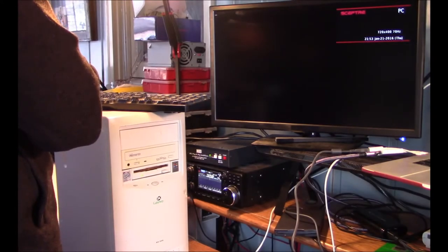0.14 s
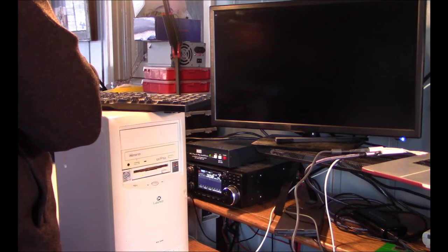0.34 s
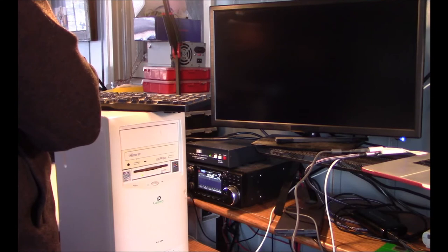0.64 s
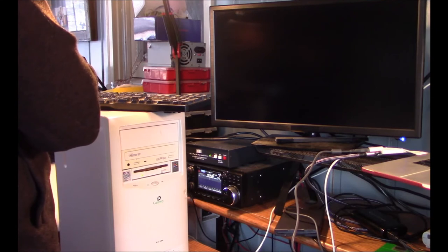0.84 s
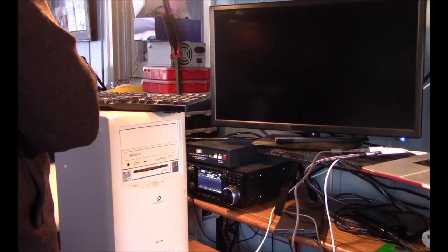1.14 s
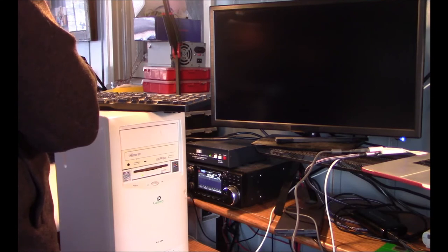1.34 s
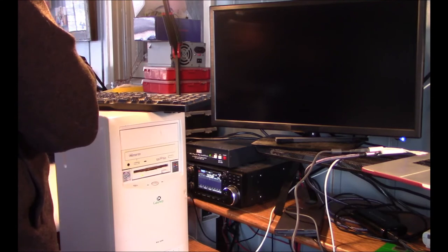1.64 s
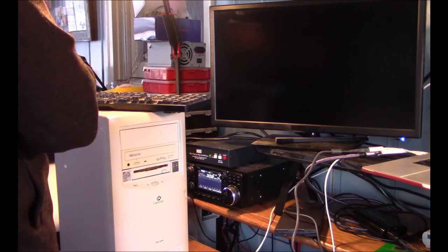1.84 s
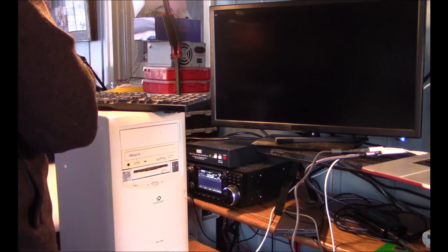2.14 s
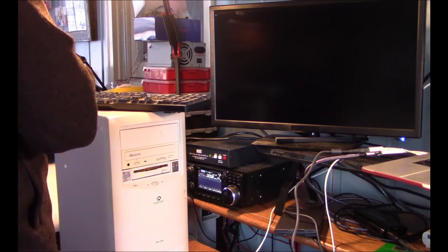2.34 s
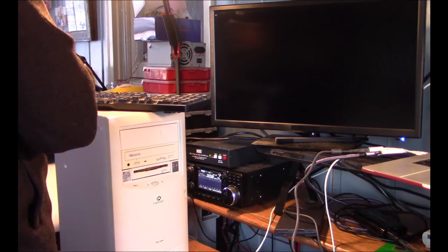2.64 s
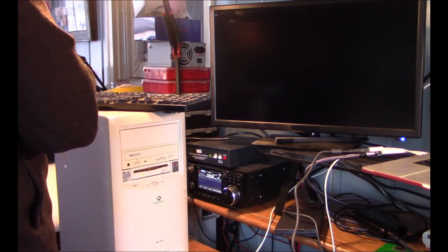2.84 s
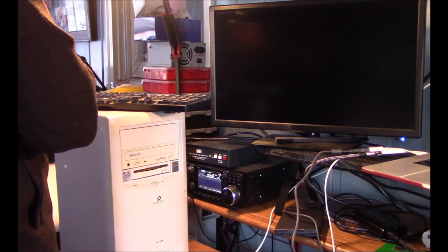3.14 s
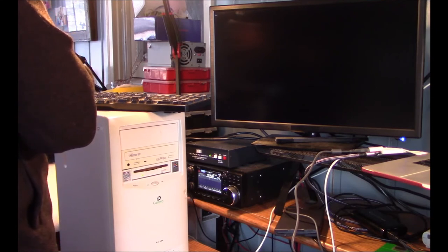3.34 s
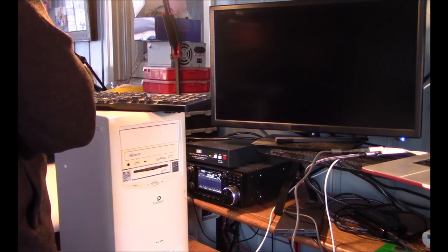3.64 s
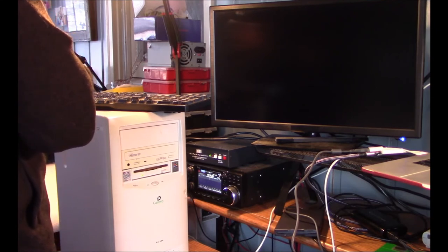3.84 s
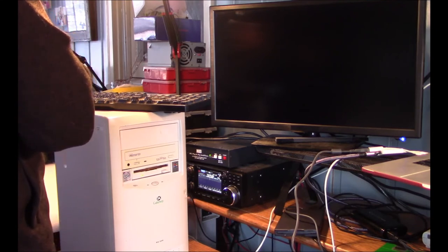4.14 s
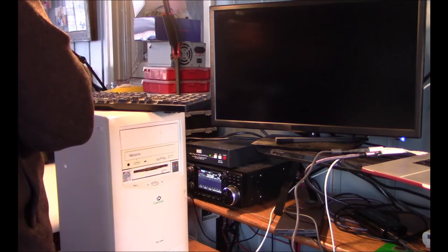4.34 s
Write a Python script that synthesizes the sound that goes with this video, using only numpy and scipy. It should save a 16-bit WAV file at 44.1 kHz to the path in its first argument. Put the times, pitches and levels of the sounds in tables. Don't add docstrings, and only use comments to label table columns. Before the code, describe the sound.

Rapid, even scratchy swishes from a disk rubbing inside its plastic shell, nearly identical each turn, with soft fan air and mains hum behind.

```python
import sys
import numpy as np
from scipy import signal
from scipy.fft import rfft, irfft, next_fast_len
from scipy.io import wavfile
from scipy.ndimage import uniform_filter1d, map_coordinates

SR = 44100
rng = np.random.default_rng(int(sys.argv[2]) if len(sys.argv) > 2 else 0)


def unload_audio(sound):
    columns = np.transpose(np.atleast_2d(sound))
    steps = np.round(np.clip(columns, -1, 1) * 32767)
    wavfile.write(sys.argv[1], SR, steps.astype(np.int16))


def nominal_scale(level):
    x = np.asarray(level, float) / 20
    return 10 ** x


N = 198109
TURN = 8816
TURNS = N // TURN + 2
LEAD_IN = TURN // 20
HZ = np.fft.rfftfreq(TURN, 1 / SR)


def unit(x):
    return x / np.sqrt(np.mean(x ** 2) + 1e-20)


def along(points, hz):
    f, v = np.transpose(points)
    return np.interp(np.log(hz + 1), np.log(f + 1), v)


def unrolled(turns):
    return turns.reshape(-1)[LEAD_IN:][:N]


def turn_time():
    return (np.arange(TURN) - LEAD_IN) / SR


# (frequency [Hz], likeness [0-1])
SURFACE_MEMORY = [(1000, .997), (3000, .985), (6000, .968), (9000, .93), (14000, .9)]
# (frequency [Hz], level [dB])
FRESH_RUBBING = [(1000, -16), (3000, -18), (6000, -18), (9000, -15), (14000, -12)]


def surface():
    worn, loose = rfft(rng.standard_normal((2, TURNS, TURN)))
    keep = np.clip(along(SURFACE_MEMORY, HZ), 0, 1)
    renew = np.sqrt(1 - keep ** 2)
    for k in range(1, TURNS):
        worn[k] = keep * worn[k - 1] + renew * worn[k]
    return worn + nominal_scale(along(FRESH_RUBBING, HZ)) * loose


# (frequency [Hz], level [dB per Hz])
SCRAPE_COLOUR = [(350, -66), (600, -17.5), (1150, -19), (1860, -8), (2340, -11.5), (2910, 3.5),
                 (3420, -5.5), (6950, -8.5), (7400, -13.5), (10200, -16.5), (11900, -14.5), (12200, -20.5),
                 (14000, -16), (15100, -22.5)]
# (frequency [Hz], width [Hz], level [dB])
SHELL_RINGS = [(1004, 25.3, -7.5), (1530, 56, -10), (1810, 20, -13), (2050, 61, -9), (2680, 90, -13),
               (2880, 100, -24), (2970, 60, -1), (3660, 15, -6.5), (3970, 17, -7.5), (4220, 18.4, 1),
               (4870, 8.3, 4), (5080, 39, 0), (5340, 65, -4.5), (6058, 64, -4.5), (6380, 26, -4),
               (6750, 67, -10), (6680, 46, -11.5), (7310, 28, -12), (7840, 32, -13.5), (8240, 26, -12),
               (8930, 32, -13), (8860, 54, -14)]
# (frequency [Hz], width [Hz], level above the scrape before a common boost [dB])
SHUTTER_RINGS = [(9750, 59, 0.5), (10800, 39, -10), (10350, 72, -7), (11170, 52, 0.5), (12010, 50, 3.5),
                 (12700, 39, -14), (12800, 58, -18), (13750, 150, -8)]


def resonance(centre_hz, width_hz):
    return 1 / (1 + (2 * (HZ - centre_hz) / width_hz) ** 2)


def body_colour(peaks_db, shutter_db):
    power = np.ones(len(HZ))
    for hz, width, db in SHELL_RINGS:
        above_scrape = nominal_scale(db + peaks_db - along(SCRAPE_COLOUR, hz))
        power += above_scrape ** 2 * resonance(hz, width)
    for hz, width, db in SHUTTER_RINGS:
        power += nominal_scale(db + shutter_db) ** 2 * resonance(hz, width)
    return nominal_scale(along(SCRAPE_COLOUR, HZ)) * np.sqrt(power)


# (time [s], pressure [dB], brightness [dB])
CONTACT_SWELL = [
    (-0.004, -22, -0.5),
    (0.001, -4, -0.5),
    (0.02, -2, 1),
    (0.059, -1.5, 1.5),
    (0.087, 2, 0),
    (0.107, -1, -2.5),
    (0.127, -5.5, -5),
    (0.157, -13.5, -5.5),
    (0.19, -24.5, -3),
]
PART_EDGES = [600, 2300, 4500, 7500, 15200]
# (level at full pressure [dB], gain per dB of brightness [dB])
RUBBING_PARTS = [(-47.5, 0.3), (-47, -1.54), (-43, 1.17), (-47, 1.34)]


def rubbing(colour, level_db, blur_s):
    rough = surface() * colour
    s, pressure_db, bright_db = np.transpose(CONTACT_SWELL)
    out = 0
    for low, high, (db, gain) in zip(PART_EDGES, PART_EDGES[1:], RUBBING_PARTS):
        slopes = (1 + (low / (HZ + 1)) ** 12) * (1 + (HZ / high) ** 12)
        band = (HZ < 15100) / np.sqrt(slopes)
        press_db = np.interp(turn_time(), s, pressure_db + gain * bright_db, period=TURN / SR)
        press = nominal_scale(press_db + db + level_db)
        press = uniform_filter1d(press, 1 + int(blur_s * SR), mode="wrap")
        out = out + press * unit(irfft(rough * band, TURN))
    return unrolled(out)


def settling(extra_db, lasts_s, turns):
    edge = np.exp(-((turn_time() - lasts_s) / lasts_s) ** 2)
    unsettled = np.exp(-np.arange(TURNS)[:, None] / turns)
    return unrolled(nominal_scale(extra_db * edge * unsettled))


# (time in turn [s], pitch [Hz], peak level [dB], half length [ms])
SQUEALS = [(0.011, 5920, -43, 2.3), (0.014, 4830, -45.5, 5), (0.017, 5170, -48, 2.5),
           (0.019, 4190, -43, 4.3), (0.0183, 6630, -46, 2.3), (0.022, 5900, -40, 4.5),
           (0.043, 4870, -45, 4.6), (0.036, 1840, -46.5, 8.6), (0.023, 1830, -50, 6),
           (0.0316, 7070, -43.5, 4.8), (0.0353, 5290, -42, 2.5), (0.0382, 6770, -38, 3.3),
           (0.0415, 5420, -36.5, 2.4), (0.05, 7090, -42, 9.1), (0.053, 6730, -39, 4.6),
           (0.0517, 6380, -43, 4), (0.052, 5820, -47, 2.5), (0.054, 6060, -40.5, 3.2),
           (0.0726, 6770, -38, 2.5), (0.075, 5300, -36.5, 3), (0.0752, 7116, -37, 4.6),
           (0.0704, 7500, -44, 3), (0.0778, 6000, -36.5, 3.1), (0.082, 5110, -38.5, 1.3),
           (0.0897, 6050, -41.5, 6), (0.0935, 5200, -41.5, 3.3), (0.097, 4870, -38, 4.3),
           (0.0978, 4170, -42.5, 11.5), (0.1118, 3970, -42, 3.6), (0.12, 5080, -45.5, 2.1)]
# (time in turn [s], pitch [Hz], peak level [dB])
EDGE_KNOCKS = [(0.004, 2855, -32), (0.011, 2844, -45.5), (0.007, 3660, -44.5), (0.021, 2920, -40),
               (0.0287, 2865, -34.5), (0.0479, 2908, -36), (0.064, 2680, -35.5), (0.061, 2970, -41),
               (0.067, 3130, -38), (0.078, 2640, -35.5), (0.076, 3080, -40), (0.09, 2767, -38),
               (0.097, 2987, -38), (0.105, 2830, -40), (0.115, 2980, -35), (0.094, 1568, -44.5),
               (0.03, 1545, -49.5), (0.059, 2106, -45), (0.099, 3670, -44), (0.122, 2820, -40),
               (0.142, 2770, -44), (0.168, 2880, -47)]
# (time in turn [s], peak level [dB])
PANEL_SHOVES = [
    (0.027, -53.5),
    (0.045, -49.5),
    (0.058, -44.5),
    (0.08, -45.5),
    (0.098, -47.5),
    (0.114, -48),
    (0.128, -47.5),
    (0.168, -54),
]


def catches():
    spots = list(SQUEALS)
    for s, hz, db in EDGE_KNOCKS:
        ring_ms = 2.68 * nominal_scale(0.24 * (db + 39))
        spots.append((s, hz, db, ring_ms))
    for s, db in PANEL_SHOVES:
        spots.append((s, 1011, db, 3.98))
    luck = rng.standard_normal((len(spots), 2, TURNS))
    out = np.zeros((TURNS, TURN))
    for (s, hz, db, ms), (size, creep) in zip(spots, luck):
        t = turn_time() - s + 7e-6 * np.cumsum(creep)[:, None]
        swell = nominal_scale(db + 0.5 * size[:, None]) * np.exp(-0.5 * (t / (ms / 1000)) ** 2)
        out += swell * np.sin(2 * np.pi * hz * (t + s))
    return unrolled(out)


# (frequency [Hz], level [dB])
WALL_COLOUR = [(600, -8), (1200, -55), (2500, -66), (3800, -26), (5000, -0.5), (6500, 4.5), (7500, -1),
               (10000, 8), (12000, 10), (13000, -4), (15000, -25)]


def wall_reflections(colour):
    smeared = rubbing(colour * nominal_scale(along(WALL_COLOUR, HZ)), level_db=-25.0, blur_s=0.025)
    return smeared * [[1], [-1]]


# (frequency [Hz], level [dB rms], drift [dB per s])
MAINS_HARMONICS = [(60, -86, 1.5), (120, -75, 0), (180, -75, 0), (240, -69.5, -.7), (300, -73, 0),
                   (360, -74, .4), (480, -79, 0)]


def hum():
    t = np.arange(N) / SR
    out = np.zeros((2, N))
    for hz, db, drift in MAINS_HARMONICS:
        knots = rng.standard_normal(int(N * 3 / SR) + 4)
        sway = map_coordinates(knots, [t * 3])
        phase = rng.uniform(0, 2 * np.pi) + rng.normal(0, 0.15, (2, 1))
        level = nominal_scale(db + drift * (t - t.mean()) + 0.78 * sway)
        out += np.sqrt(2) * level * np.sin(2 * np.pi * hz * t + phase)
    return out


# (frequency [Hz], level [dB per Hz])
FAN_COLOUR = [(25, -14), (45, -22), (80, -11), (120, -5.5), (250, 1), (500, -2), (1000, -4), (2500, -5),
              (5000, -9.5), (9000, -21.5), (13000, -37.5), (15700, -34)]
# (frequency [Hz], likeness [0-1])
FAN_LIKENESS = [(30, .2), (70, 0.45), (120, 0.68), (400, 0.65), (1000, 0.92), (2500, 0.95), (6000, 0.75),
                (9000, 0.82), (14000, .999)]


def fans(level_db):
    m = next_fast_len(N)
    hz = np.fft.rfftfreq(m, 1 / SR)
    spread = np.arccos(np.clip(along(FAN_LIKENESS, hz), -1, 1)) / 2
    air = rfft(rng.standard_normal((2, m))) * nominal_scale(along(FAN_COLOUR, hz))
    mid, side = irfft(air * [np.cos(spread), np.sin(spread)], m)[:, :N]
    return nominal_scale(level_db) * unit(np.array([mid + side, mid - side]))


def scene():
    colour = body_colour(peaks_db=6.5, shutter_db=9.0)
    scrape = rubbing(colour, level_db=-3, blur_s=0.0015)
    scrape = scrape * settling(extra_db=3, lasts_s=0.008, turns=5)
    drive = scrape + nominal_scale(-4.0) * catches()
    return drive + wall_reflections(colour) + hum() + fans(level_db=-55.5)


def low_pass(x):
    return signal.sosfilt(signal.butter(12, 15700, fs=SR, output="sos"), x)


def record(dry):
    hz = np.fft.rfftfreq(N, 1 / SR)
    limited = irfft(rfft(dry) * (hz < 15720), N)
    return low_pass(limited)


dry = scene()
out = record(dry)
unload_audio(out)
```